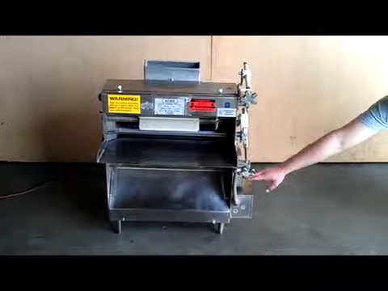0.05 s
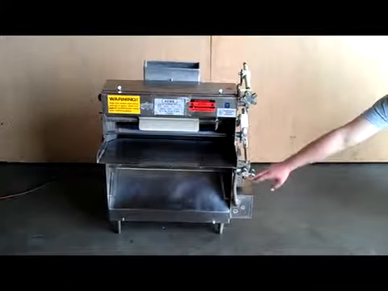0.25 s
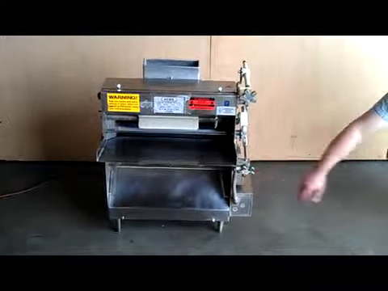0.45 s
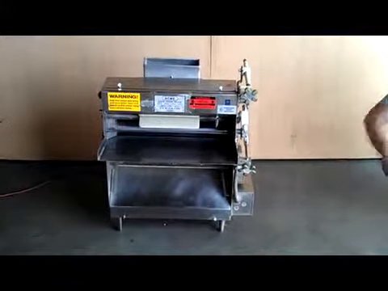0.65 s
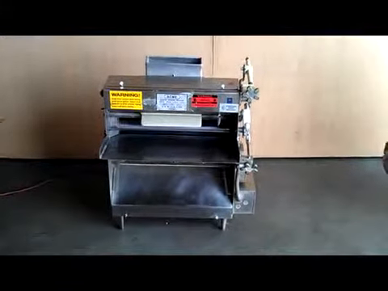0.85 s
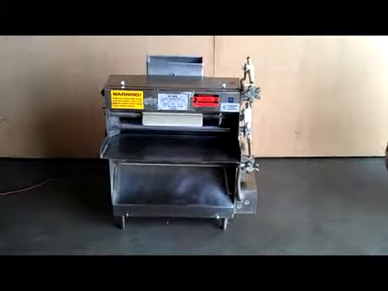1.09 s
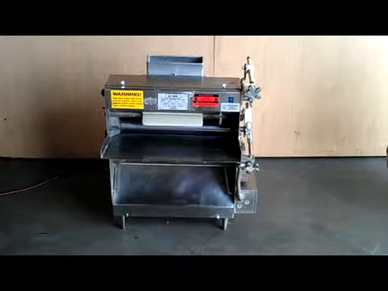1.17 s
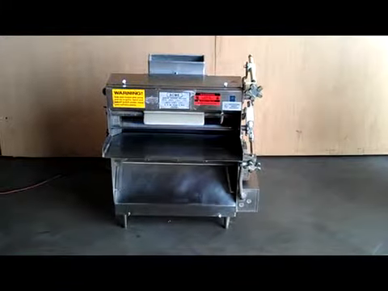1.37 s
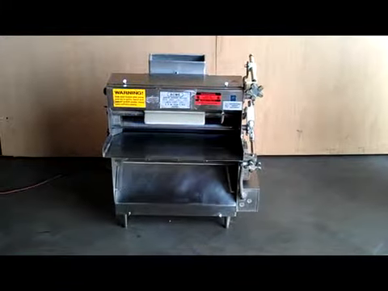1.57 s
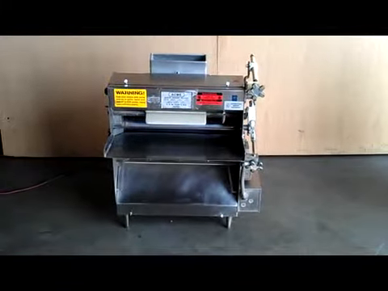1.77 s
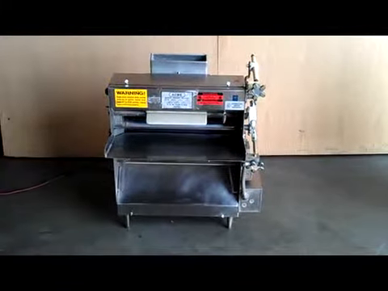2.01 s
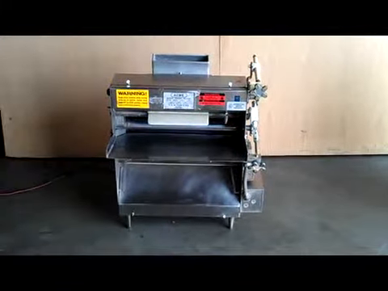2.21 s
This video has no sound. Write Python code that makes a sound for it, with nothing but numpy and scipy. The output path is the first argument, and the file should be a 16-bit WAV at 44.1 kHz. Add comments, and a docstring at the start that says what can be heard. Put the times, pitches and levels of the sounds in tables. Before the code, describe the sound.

A motorized dough roller is switched on, clattering loudly before settling into a steady whir.

```python
"""A hard-floored workshop with a bench dough roller being switched on, in stereo. The switch clunks (noise chatter
ringing the box), then the starting jolt makes a loose steel tray clatter on the frame: bursts of random impacts
through ringing modes and dense noise crashes, loud enough to overload the recorder, with low bursts of dying sines.
Motor hum (wavering sines), roller whir (flickering noise and ticks), ringing frame bands, soft knocks of the drive
chain (dying sines) and the workshop air (shaped noise) remain."""
import sys
import numpy as np
from scipy import signal
from scipy.fft import rfft, irfft
from scipy.io import wavfile
from scipy.ndimage import uniform_filter1d

SR = 44100
rng = np.random.default_rng(int(sys.argv[2]) if len(sys.argv) > 2 else 0)


def to_linear_factor(level_db):
    """Convert decibel levels (scalar or array-like) to linear amplitude factors."""
    exponent = np.asarray(level_db, float) / 20
    return 10 ** exponent


def to_wav(sig):
    """Store sig (one row per channel, or 1-D mono) as 16-bit WAV at the path in sys.argv[1].

    Samples outside -1..1 are clipped; the rate is SR.
    """
    pcm = np.clip(np.atleast_2d(sig), -1, 1) * 32767
    pcm = np.round(pcm).astype(np.int16)
    wavfile.write(sys.argv[1], SR, pcm.T)  # frames by channels


N = 99225  # samples
RISE_S = 0.0019  # usual onset time of a blow


def evened(x):
    """Scales each channel to an rms of 1."""
    return x / np.sqrt(np.mean(x ** 2, -1, keepdims=True) + 1e-20)


def unit(x):
    """Scales each channel to an energy of 1."""
    return x / np.linalg.norm(x, axis=-1, keepdims=True)


def read(points, hz):
    """Reads a curve over frequency, interpolated on a logarithmic axis."""
    f, value = np.transpose(points)
    return np.interp(np.log(hz + 1), np.log(f + 1), value)


def along(curve):
    """Reads a curve over time at every sample."""
    return np.interp(np.arange(N) / SR, *np.transpose(curve))


def coloured(x, gain_at):
    """Filters by a gain over frequency, leaving the phase alone."""
    gain = gain_at(np.fft.rfftfreq(x.shape[-1], 1 / SR))
    return irfft(rfft(x) * gain, x.shape[-1])


def wander(size):
    """Slow random drift of rms 1, smoothed twice over size samples."""
    once = uniform_filter1d(rng.standard_normal(N), size)
    return evened(uniform_filter1d(once, size))


def hiss(spectrum):
    """Patchy, flickering noise for mid and side: the level varies over time and frequency; rms 1."""
    patch_db, flicker_db = 1.6, 1.4
    _, _, z = signal.stft(rng.standard_normal((2, N + 2048)), SR, nperseg=512, noverlap=384)
    patch = rng.standard_normal(z.shape[1:])
    patch = uniform_filter1d(patch, size=6, axis=0)  # across frequency
    patch = uniform_filter1d(patch, size=20, axis=1)  # along time
    flicker = uniform_filter1d(rng.standard_normal(patch.shape[1]), size=4)
    gain_db = patch_db * patch / patch.std() + flicker_db * evened(flicker)
    x = signal.istft(z * to_linear_factor(gain_db), SR, nperseg=512, noverlap=384)[1]
    return evened(coloured(x[:, :N], lambda f: to_linear_factor(read(spectrum, f))))


def dying(spectrum, t60s, size):
    """Two noise tails, mid and side, each band dying at its own speed; energy 1."""
    hz, t, z = signal.stft(rng.standard_normal((2, size)), SR, nperseg=128)
    t60 = np.maximum(read(t60s, hz), .005)
    z = z * to_linear_factor(read(spectrum, hz)[:, None] - 60 * t / t60[:, None])
    return unit(signal.istft(z, SR, nperseg=128)[1])


def ringing(modes):
    """Dying sines with other phases for mid and side; energy 1."""
    t = np.arange(16000) / SR
    total = 0
    for hz, db, t60 in modes:
        phase = np.array([[0], [rng.random()]])  # in turns
        total = total + to_linear_factor(db - 60 * t / t60) * np.sin(2 * np.pi * (hz * t + phase))
    return unit(total)


def spot(modes):
    """The same modes as heard from one striking spot, which changes the strength of each."""
    spread_db = 2.5
    return ringing([(hz, db + spread_db * rng.standard_normal(), t60) for hz, db, t60 in modes])


def struck(s, modes, rise_s=RISE_S):
    """One clean onset at time s: dying sines with a soft start."""
    t = np.clip(np.arange(N) / SR - s, 0, None)
    modes_sum = sum(to_linear_factor(db - 60 * t / t60) * np.sin(2 * np.pi * hz * t) for hz, db, t60 in modes)
    return np.clip(t / rise_s, 0, 1) * modes_sum


def burst(s, length, t60):
    """Envelope of a burst: quick rise, hold, exponential fall."""
    t = np.arange(N) / SR - s
    return np.clip(t / RISE_S, 0, 1) * to_linear_factor(-60 * np.clip(t - length, 0, 1) / t60)


def clicks(per_s, spread_db):
    """Random-signed impacts of uneven size at random times; rms 1."""
    size = to_linear_factor(spread_db * np.minimum(rng.exponential(1, N), 5))
    size = size * rng.choice([-1, 1], N)
    return evened(size * (rng.random(N) < per_s / SR))


def through(x, response):
    """Lets a signal excite a resonant body, given by its impulse response."""
    return signal.fftconvolve(np.atleast_2d(x), response, axes=1)[:, :N]


def air():
    """Workshop air: shaped noise that swells briefly at the start."""
    # noise spectrum: f/Hz, relative level/dB
    air_spectrum = [(24, -72), (40, -36), (112, -5), (446, 3), (579, -8), (829, -4.5), (4300, -15.5),
                    (8190, -27.5), (12000, -33), (15600, -75), (22000, -120)]
    # swell: t/s, relative level/dB
    air_swell = [(0, -2), (.06, 6), (.12, 4), (.16, -0.5), (.19, 0.5)]
    return to_linear_factor(-52.5 + along(air_swell)) * hiss(air_spectrum)


def hum():
    """Motor hum: sines on multiples of twice the mains frequency, each wavering in level."""
    # partials: multiple of the base frequency, relative level/dB
    partials = [(1, -14), (3, 1), (4, -17.5), (5, -11.5), (8, -14.5), (9, -11)]
    # course of the whole hum: t/s, relative level/dB
    hum_level = [(0.8, -46), (1.02, -34.5), (1.1, -44), (1.328, -37.5), (1.708, -40), (1.8, -50),
                 (1.866, -35), (1.954, -41), (1.998, -53), (2.152, -37.5), (2.22, -56), (2.25, -40)]
    base_hz, waver_db = 119.2, 1
    t = np.arange(N) / SR
    total = 0
    for k, db in partials:
        level = to_linear_factor(db + 3 + waver_db * wander(size=2500))  # 3 dB: from rms to peak of a sine
        total = total + level * np.sin(2 * np.pi * (k * base_hz * t + rng.random((2, 1))))
    return to_linear_factor(along(hum_level)) * total


def frame():
    """The running frame rings in narrow bands, each a noise through a resonance."""
    # bands: f/Hz, width at half amplitude/Hz, level/dB
    bands = [(196.5, 36, -49.5), (1370, 67, -43.5), (1767, 58, -46), (2210, 20, -55), (4400, 590, -45)]
    total = 0
    for hz, width, db in bands:
        noise = rng.standard_normal((2, N))
        band = coloured(noise, lambda f: 1 / (1 + (2 * (f - hz) / width) ** 2))
        total = total + to_linear_factor(db) * evened(band)
    return total


def whir():
    """Roller whir: flickering noise with dense chain ticks that ring in the same colour."""
    # whir spectrum: f/Hz, relative level/dB
    whir_spectrum = [(60, -21), (110, -31), (200, -15), (350, -8), (450, -6), (560, -15.5), (950, -8.5),
                     (1010, -14), (1350, -10.5), (1800, -10.5), (2500, -11), (3600, -10.5), (4500, -12),
                     (6000, -16), (8000, -16), (10200, -19.5), (13000, -41)]
    # effort of the roller: t/s, level/dB
    effort = [(.2, -25), (.3, -22.5), (.5, -17.5), (.7, -26.5), (.85, -26), (1.2, -28.5), (1.6, -29),
              (2.25, -30)]
    tick_body = dying(whir_spectrum, [(500, 0.069), (8000, 0.025)], size=2048)  # f/Hz, t60/s
    ticks = through(clicks(per_s=1500, spread_db=-1.5), tick_body)
    return to_linear_factor(along(effort)) * (hiss(whir_spectrum) + to_linear_factor(-10) * ticks)


def machine():
    """The running machine: whir, hum and frame bands fade in together as it spins up."""
    start_s, spin_up_s = 0.18, 0.057
    t = np.arange(N) / SR
    return np.clip((t - start_s) / spin_up_s, 0, 1) * (whir() + hum() + frame())


def knocks():
    """The switch's dull rebound at 0.227 s, then soft knocks of the drive chain: each rings nearby modes most."""
    # rebound (first row) and chain knocks: t/s, relative level/dB, centre f/Hz
    dull_knocks = [(0.2274, -6, 1310), (1.47, -19, 1260), (1.5242, -20.5, 1900), (1.597, -16, 1610),
                   (1.7518, -18, 1700), (1.7636, -15.5, 1550), (1.777, -25, 1370), (1.92, -25, 1500),
                   (1.933, -16.5, 1760), (1.9709, -18.5, 1250), (1.9847, -16, 1950), (2.019, -31, 1900)]
    # chain guard modes, which also colour the rebound: f/Hz, relative level/dB, t60/s
    guard = [(1259, -1.5, .05), (1381, 0, 0.043), (1752, 2.5, 0.039), (2205, -5, 0.052)]
    all_db, width_hz = -7, 350
    total = 0
    for s, db, centre_hz in dull_knocks:
        modes = []
        for hz, mode_db, t60 in guard:
            off_centre_db = 10 * np.log10(1 + ((hz - centre_hz) / width_hz) ** 4)
            modes.append((hz, db + all_db + mode_db - off_centre_db, t60))
        total = total + struck(s, modes)
    return total


def low_bursts():
    """Low bursts under the loudest blows, as the overloaded recorder makes them: softly starting, dying sines."""
    # bursts: t/s, relative level/dB
    burst_times = [(.42, -17), (.445, -14), (.508, -14), (0.654, -25)]
    # sines of each burst: f/Hz, relative level/dB, t60/s
    low_burst_modes = [(62, 5, .15), (91, -1, 0.13)]
    return sum(to_linear_factor(db) * struck(s, low_burst_modes, rise_s=.012) for s, db in burst_times)


def lever():
    """The switch lever lands: one clean low clunk."""
    # lever mode: f/Hz, level/dB, t60/s
    lever_modes = [(341, -15, .13)]
    return struck(.197, lever_modes)


def sheet():
    """One dense, quickly dying crash of sheet steel, with its bass filtered away."""
    # crash spectrum: f/Hz, relative level/dB
    sheet_spectrum = [(80, -52), (200, -29), (350, -13), (550, -15), (900, -15.5), (1200, -15),
                      (1500, -9.5), (2300, -13.5), (3100, -9), (4500, -3), (5600, -9.5), (8000, -17),
                      (10000, -13.5), (11500, -34), (14000, -65)]
    # decay: f/Hz, t60/s
    sheet_t60 = [(100, 0.085), (1000, 0.089), (5000, 0.024), (12000, 0.029)]
    b, a = signal.butter(2, 175, "high", fs=SR)
    return signal.lfilter(b, a, dying(sheet_spectrum, sheet_t60, size=4096))


def switch():
    """A short chatter of contacts rings the switch box and the sheet around it."""
    # contact chatter: t/s, level/dB, length/s
    contacts = [(0.196, -15.5, .024)]
    # switch box modes: f/Hz, relative level/dB, t60/s
    box_modes = [(1250, -5.5, 0.22), (2310, -9.5, 0.09), (3730, 12, 0.01), (4130, -1, 0.018),
                 (9570, -1.5, 0.016)]
    envelope = sum(to_linear_factor(db) * burst(s, length, t60=0.092) for s, db, length in contacts)
    chatter = envelope * rng.standard_normal(N)
    return through(chatter, ringing(box_modes)) + to_linear_factor(-1.5) * through(chatter, sheet())


def tray():
    """Each blow rings the tray cleanly; its chatter rings the rim and crashes the sheet at one of several spots."""
    # blows: t/s, treble level/dB, then relative to it: bass level/dB, whistling ring level/dB, low ring level/dB
    blows = [(0.281, -3.5, -3.5, -21, -28), (0.3044, -9, 1, -23, -20), (0.34, -4.5, -3, -28, -17),
             (0.3789, 1.5, -9, -20, -21), (0.398, -9, 4, -18, -9.5), (0.4137, 4.5, -1, -28, -20.5),
             (0.4254, 5, -2.5, -29, -15), (0.4388, 2.5, -1, -13, -15.5), (0.455, -2.5, 0, -30, -13),
             (0.4676, -3.5, -14, -28, -9), (0.4984, 3.5, -14, -26, -10.5), (0.5033, 3, -25, -11.5, -27),
             (0.5191, 5.5, -7, -6.5, -22), (0.5328, 0, -15, -28, -21), (0.562, 1, -9.5, -25, -11),
             (0.5936, 0, -14, -20, -15), (0.621, -3.5, -6.5, -18, -12), (0.6535, 10, -11, -21, -17),
             (0.6694, 0, 0.5, -13, -14.5), (0.6856, 0.5, -6, -26, -33), (0.7132, -8, -2.5, -33, -26),
             (0.8708, -15.5, -2.5, -23, -13), (0.936, -12, -1.5, -17, -21), (0.9689, -9, -3, -15, -15.5),
             (0.9946, -14, -8, -21, -13.5), (1.0313, -9, -7.5, -14, -19), (1.0624, -13, -27, -23, -15.5),
             (1.0898, -17.5, 7.5, -22, -28), (1.1291, -16, -1, -29, -25), (1.371, -21.5, -17, -16, -10)]
    # modes below, all: f/Hz, relative level/dB, t60/s
    # low tray modes
    low_modes = [(217.5, -24.5, 0.39), (363.2, -8, 0.26), (429, -10, 0.24), (892, -14, 0.27),
                 (956.4, 1.5, 0.13), (975.7, -5.5, 0.19)]
    # middle tray modes, which follow the treble
    middle_modes = [(1465, -6.5, 0.12), (2008, 1, 0.11), (2346, -4.5, 0.21), (2471, 4.5, 0.15),
                    (3763, 0, 0.13)]
    # the whistling tray mode
    whistle_modes = [(5213, 0, .12)]
    # quickly dying modes of the stiff rim that takes each blow
    rim_modes = [(4306, -1.5, 0.043), (4410, -5.5, 0.032), (4680, -2.5, 0.061), (6196, -5.5, 0.072),
                 (7470, -2.5, 0.029), (8000, -13, 0.083), (9900, -6.5, 0.023)]
    spots, split_hz = 6, 2400
    tray_db, bass_all_db, ring_all_db, low_all_db, rim_db, middle_db = -9.5, 6, 33.5, 35, -5, -9

    chatter = clicks(per_s=4000, spread_db=2.5)
    power = np.zeros((spots, 2, N))  # treble and bass for each spot
    ring, low = np.zeros((2, N))
    for k, (s, db, bass_db, ring_db, low_db) in enumerate(blows):
        treble_and_bass = to_linear_factor(db + np.array([[0], [bass_db + bass_all_db]]))
        envelope = burst(s - RISE_S, length=0.0065, t60=0.079)  # fully risen at s
        power[k % spots] += (treble_and_bass * envelope) ** 2
        ring[round(s * SR)] = to_linear_factor(db + ring_db + ring_all_db)
        low[round(s * SR)] = to_linear_factor(db + low_db + low_all_db)
    out = through(ring, ringing(whistle_modes)) + through(low, ringing(low_modes))

    b, a = signal.butter(2, split_hz, fs=SR)
    for treble, bass in np.sqrt(power) * chatter:
        drive = treble + signal.lfilter(b, a, bass - treble)  # bass level below the split
        out = out + through(drive, sheet())
        body = to_linear_factor(rim_db) * spot(rim_modes) + to_linear_factor(middle_db) * spot(middle_modes)
        out = out + through(treble, body)
    return to_linear_factor(tray_db) * out


def room(source):
    """Tail of the hard-floored room: noise dying at a different speed in each band."""
    # decay of the room: f/Hz, t60/s
    room_t60 = [(200, 0.49), (1000, 0.62), (4000, 0.26), (10000, 0.057)]
    tail = dying([(100, 0), (10000, -.1)], room_t60, size=40000)  # almost flat: f/Hz, level/dB
    return to_linear_factor(-11.5) * through(source, tail)


def scene():
    """Hits with their room tail, running machine and air, spread from mid and side to left and right."""
    # stereo width, gain on the side signal: f/Hz, level/dB
    width_gain = [(60, -17), (110, -21), (200, -11), (370, -15), (670, -10), (1220, -8.5), (2220, -3),
                  (4050, -5.5), (7400, -0.5), (13500, -1)]
    right_db = 0.35  # right raised and left lowered by this much
    mid_only = np.array([[1], [0]])
    hits = tray() + switch() + mid_only * (knocks() + low_bursts() + lever())
    hits = hits + room(hits[0])
    mid, side = hits + machine() + air()
    side = coloured(side, lambda f: to_linear_factor(read(width_gain, f)))
    return np.array([mid + side, mid - side]) * to_linear_factor(np.array([[-right_db], [right_db]]))


def band_limit(x):
    """A steep low-pass at the top of the band."""
    return signal.sosfilt(signal.butter(12, 14110, fs=SR, output="sos"), x)


def record(dry):
    """Microphone with a low cut and a dip in its response, then a lopsided bend and hard overload."""
    low_cut_hz, dip_hz, dip_width_hz, dip_depth = 140, 3088, 560, 0.61
    lopsided, ceiling = 0.028, 0.88
    x = signal.sosfilt(signal.butter(3, low_cut_hz, "high", fs=SR, output="sos"), dry)
    x = coloured(x, lambda f: 1 - dip_depth / (1 + (2 * (f - dip_hz) / dip_width_hz) ** 2))
    bent = x + lopsided * np.minimum(x ** 2, 1)  # one half-wave bends more than the other
    mix = np.clip(bent, -ceiling, ceiling)
    return band_limit(mix)


dry = scene()
out = record(dry)
to_wav(out)
```